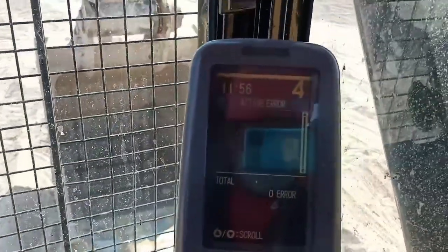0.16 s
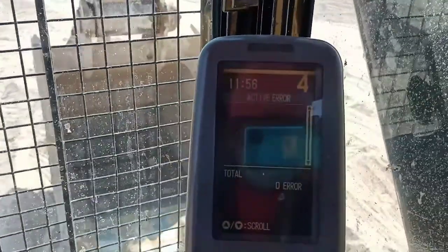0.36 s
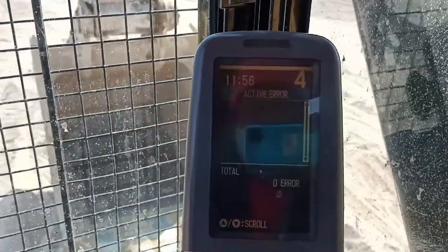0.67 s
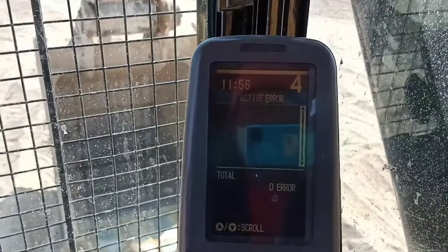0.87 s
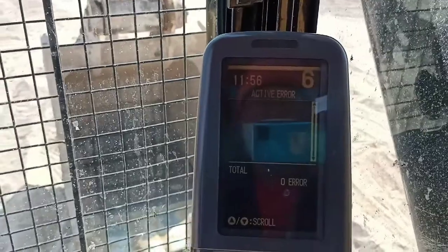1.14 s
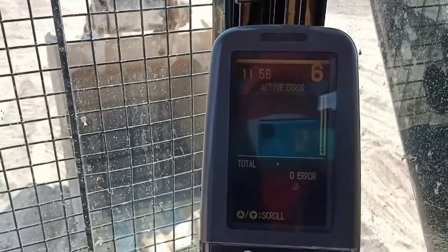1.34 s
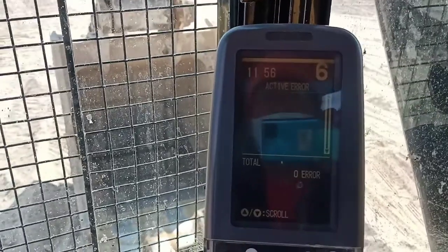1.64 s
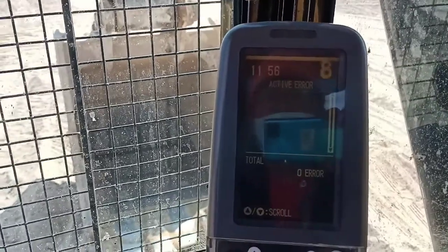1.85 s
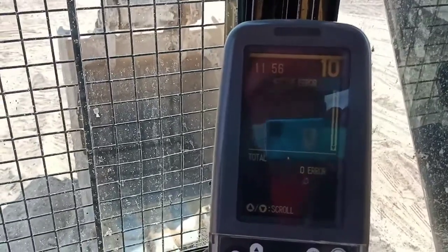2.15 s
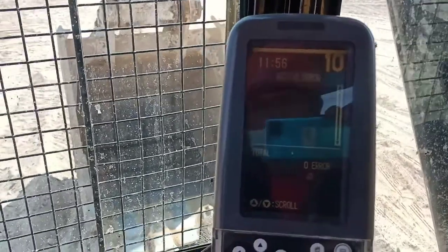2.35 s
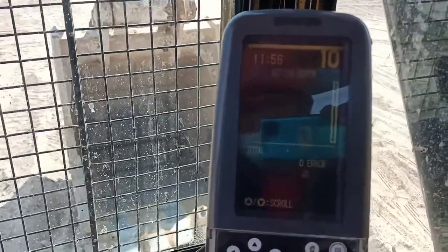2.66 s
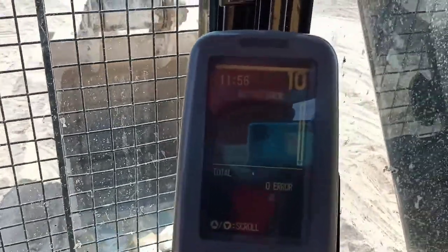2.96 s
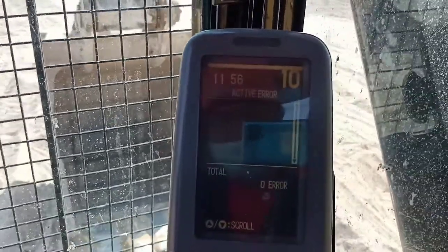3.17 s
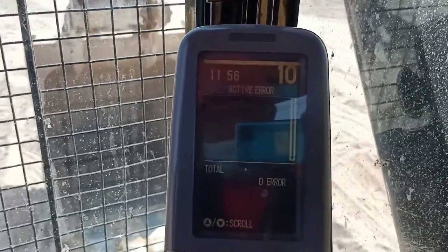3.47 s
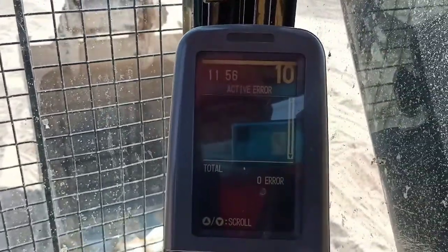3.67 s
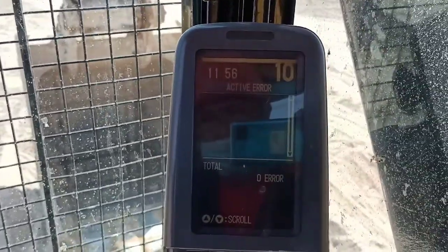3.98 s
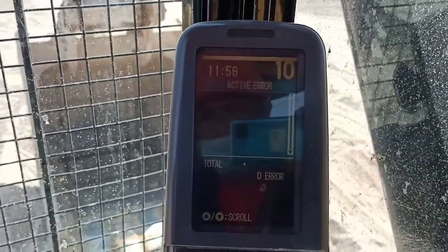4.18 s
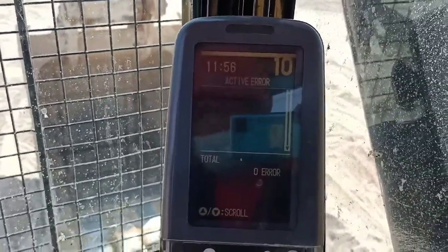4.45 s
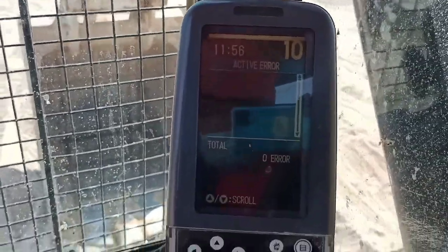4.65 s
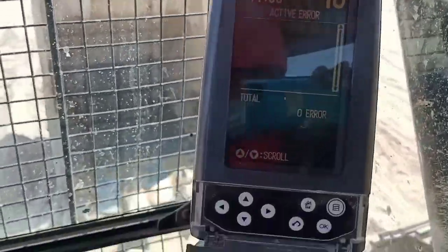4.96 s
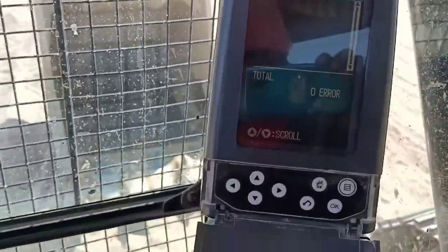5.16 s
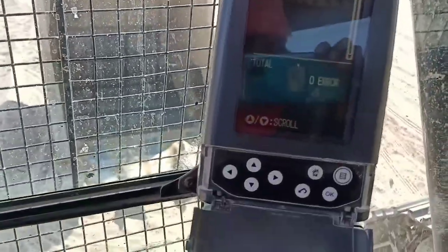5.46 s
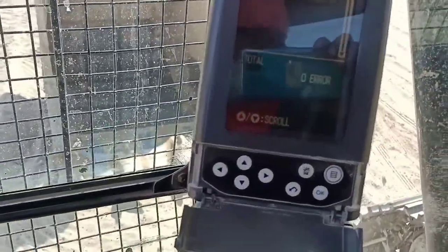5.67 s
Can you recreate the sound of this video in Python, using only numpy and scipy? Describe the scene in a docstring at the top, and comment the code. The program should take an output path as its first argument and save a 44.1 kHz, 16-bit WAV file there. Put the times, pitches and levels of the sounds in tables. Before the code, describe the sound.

A diesel excavator engine is heard throughout from inside the closed cab, starting at idle with a low boom, an uneven throb, metallic knocking and a faint whine of pumps and gears. At about 1.2 seconds a throttle dial gives two quick, close clicks, and the engine climbs to a middle speed by 1.7 seconds, knocking harder as it pulls. Around 2.0 to 2.2 seconds the dial ticks four more times. The engine rises again with a brief metallic rasp, overshoots slightly at 2.5 seconds and settles at full speed by 3 seconds. It then runs steadily, louder and more rattling than at idle, its roar gradually thickening. At about 4.6 seconds a hard fitting snaps with a bright click and a very short rattle. The engine carries on unchanged to the end, near 5.8 seconds.

```python
"""Excavator cab, throttling up

A six-cylinder diesel heard inside the closed cab. The throttle dial clicks round twice and the engine
steps from idle to half and then to full speed, overshooting a little. Exhaust pulses boom in the cab,
uneven cylinders throb, the block knocks, pumps and gears whine; near the end a hard fitting snaps."""
import sys
import numpy as np
from scipy import signal
from scipy.fft import rfft, irfft
from scipy.io import wavfile
from scipy.ndimage import uniform_filter1d

SR = 44100
rng = np.random.default_rng(int(sys.argv[2]) if len(sys.argv) > 2 else 0)


def master(y):
    """Save y as 16-bit WAV."""
    cut = np.clip(np.atleast_2d(y).T, -1, 1)
    pcm = np.round(cut * 32767)  # scale
    wavfile.write(sys.argv[1], SR, pcm.astype(np.int16))


N = 256662
TIME = np.arange(N) / SR
CYLINDERS = 6

# firing rate at idle, half and full speed: f/Hz
THROTTLE_HZ = [64.7, 80.5, 99]
# panel and block resonances: f/Hz, width/Hz, lift/dB
METAL_MODES = [(340, 57, 5), (717, 43, 7), (793, 24, 9), (934, 18, 9.5), (1452, 76, 5.5), (2059, 35, 8.5),
               (2197, 160, 4.5)]


def amp(db):
    """Decibels to gain."""
    return np.exp(np.asarray(db) * (np.log(10) / 20))


def unit(x):
    """Scale to rms 1."""
    return x / np.sqrt(np.mean(x ** 2))


def curve(points):
    """Join (time, value) points with straight lines."""
    return np.interp(TIME, *np.transpose(points))


def colour(x, points, modes=()):
    """EQ by (Hz, dB) points, falling steeply outside them, and lift the resonances; rms 1."""
    hz, db = np.transpose(points)
    bins = np.arange(1, N // 2 + 2) * SR / N
    octave, knots = np.log2(bins), np.log2(hz)
    outside = np.abs(octave - np.clip(octave, knots[0], knots[-1]))
    lift_db = sum(peak_db / (1 + (2 * (bins - centre) / width) ** 2) for centre, width, peak_db in modes)
    return unit(irfft(rfft(x) * amp(np.interp(octave, knots, db) + lift_db - 60 * outside), N))


def drift(rate_hz, hop=32):
    """Smooth random modulation, rms about 1."""
    coarse, size = np.arange(0, N + hop, hop) / SR, int(SR / hop / rate_hz)
    steps = np.repeat(rng.standard_normal(len(coarse) // size + 1), size)[:len(coarse)]
    return np.interp(TIME, coarse, unit(uniform_filter1d(uniform_filter1d(steps, size), size)))


def ringing(envelope, hz, width_hz, order=4):
    """Noise rings one resonance; the envelope sets its rms."""
    edges = np.clip([hz - width_hz / 2, hz + width_hz / 2], 20, SR / 2 - 1)
    band = signal.butter(order, edges, "band", fs=SR, output="sos")
    burst = signal.sosfilt(band, (envelope + 1e-18) * rng.standard_normal(N))
    return unit(burst) * np.sqrt(np.mean(envelope ** 2))


def fade(start, t60):
    """Sudden attack, exponential decay."""
    return (TIME >= start) * np.exp(-np.log(1000) * np.abs(TIME - start) / t60)


def tap(start, db, hz, width_hz, t60):
    """One short blow on a hard part."""
    return amp(db) * ringing(fade(start, t60), hz, width_hz)


def strike(blows, response):
    """Each blow starts the response; the engine is already running at time zero."""
    return signal.oaconvolve(np.pad(blows, (len(response) - 1, 0), "reflect"), response, "valid")


def revs(hz):
    """Speed as a share of the way from idle (0) to full (1)."""
    return (hz - THROTTLE_HZ[0]) / (THROTTLE_HZ[-1] - THROTTLE_HZ[0])


def rev_gain(hz, idle_db, rise_db):
    """Gain of a layer that grows by rise_db from idle to full speed."""
    return amp(idle_db + rise_db * revs(hz))


def finger_brush():
    """Fingers brush the dial before turning it: a faint, very high rustle of skin on plastic."""
    # touch of the fingers: t/s, level/dB
    touch = [(0.55, -100), (0.72, -72), (1.0, -69), (1.15, -100)]
    return ringing(amp(curve(touch)), hz=14500, width_hz=2000, order=2)


def cab_air(hz, load, rumble_db=-41, swell_db=11):
    """The cab's air rumbles as the speed changes and drones at one pitch, louder with the revs."""
    # rumble spectrum: f/Hz, level/dB
    spectrum = [(20, -20), (45, -9.5), (80, -5), (160, -4.5), (330, -10), (430, -17), (700, -40.5)]
    rumble = amp(rumble_db + swell_db * np.abs(load) * revs(hz)) * colour(rng.standard_normal(N), spectrum)
    drone = ringing(rev_gain(hz, idle_db=-52, rise_db=10.5), hz=168.4, width_hz=60, order=2)
    return rumble + drone


def loose_panel(hz, load, load_db=14):
    """A loose panel booms in fits, most under load."""
    drive = rev_gain(hz, idle_db=-47, rise_db=1.5) * amp(load_db * load)
    return ringing(drive, hz=346, width_hz=24, order=2)


def roar():
    """The engine's low-mid roar thickens as the listener leans forward."""
    # swell of the roar: t/s, level/dB
    swell = [(1.3, -59), (2.4, -56.5), (4.3, -45.5), (4.9, -45.5), (5.82, -43)]
    return ringing(amp(curve(swell)), hz=660, width_hz=386)


def rasp(flicker_db=2.7):
    """A flickering metallic rasp above the knock, harshest on a hard pull."""
    # bite of the rasp: t/s, level/dB
    bite = [(1.28, -58), (1.39, -50), (1.48, -48.5), (1.63, -47), (1.8, -59), (2.2, -51), (2.33, -45.5),
            (2.49, -41.5), (2.58, -53), (2.7, -55), (2.85, -53.5), (4.95, -52.5), (5.1, -48), (5.82, -53)]
    return ringing(amp(curve(bite) + flicker_db * drift(45)), hz=2840, width_hz=510, order=3)


def gear_whistle(hz, cycle, order=233):
    """A thin gear whistle: a rough smear as the engine gathers speed, clearer at half speed."""
    db = np.interp(hz, [65, 73, 81, 90], [-70, -52.5, -55.5, -65]) + 2.5 * drift(25)
    wobble_rad = np.interp(hz, [72, 78], [1.7, .75])
    return np.sqrt(2) * amp(db) * np.sin(2 * np.pi * order * cycle + wobble_rad * drift(90))


def whines(hz, cycle, waver_db=2, wobble_rad=0.48):
    """Pump pistons and gear teeth sing with the shaft, most of them louder as it speeds up."""
    # whines: multiple of the cycle rate (rounded below), idle level/dB, full-speed level/dB
    partials = [(30, -52.5, -53), (34, -65.5, -56), (36, -59.5, -52.5), (39, -58, -60), (42, -70, -57.5),
                (44, -71, -55), (45, -59, -59.5), (49, -72.5, -53.5), (56, -64.5, -57), (59, -70, -56.5),
                (60, -69, -56), (62.85, -58, -55), (68.37, -55, -60), (73.24, -65.5, -54.5),
                (83, -67, -66.5), (87.4, -59.5, -59), (90.7, -71, -55), (107.9, -65, -51.5),
                (126.5, -64, -52), (209.7, -72, -62.5), (257, -77, -67), (415, -88, -72.5)]
    out = 0
    for order, idle_db, full_db in partials:
        db = idle_db + (full_db - idle_db) * revs(hz) + waver_db * drift(12)
        phase = 2 * np.pi * (round(order) * cycle + rng.random()) + wobble_rad * drift(16)
        out += amp(db) * np.sin(phase)
    return np.sqrt(2) * out


def throttle_dial(cab_db=-16, cab_t60=0.045):
    """A sprung ball ticks off one notch and drops into the next, ringing the knob; the cab answers."""
    # detents: t/s, tick level/dB, bright edge level/dB, seating delay/s, seating level/dB, f/Hz, width/Hz
    detents = [(1.1988, -39.5, -57, 0.0031, -30, 4080, 450), (1.2524, -40.5, -53, 0.0029, -34, 4660, 450),
               (2.032, -38.5, -48, 0.0016, -53, 5170, 3000), (2.0868, -41, -51, 0.0048, -33, 6700, 3200),
               (2.14, -42.5, -44, 0.003, -50, 6000, 3000), (2.1837, -44.5, -47, 0.0054, -46, 6560, 2000)]
    # tick spectrum: f/Hz, level/dB
    spectrum = [(1500, -22), (2700, 6), (3500, 4), (4700, 0.5), (6800, 3), (8200, -6), (9000, -0.5),
                (12000, -13), (13000, -5), (15000, -5)]
    tick = colour(rng.standard_normal(N), spectrum)
    out = tap(start=1.2028, db=-28, hz=2650, width_hz=700, t60=.012)  # the knob knocks on its shaft
    for start, tick_db, edge_db, delay, seat_db, ring_hz, width_hz in detents:
        out += amp(tick_db) * tick * (fade(start, t60=0.062) + amp(cab_db) * fade(start, cab_t60))
        out += tap(start, edge_db, hz=15200, width_hz=900, t60=.04)
        seating = fade(start + delay, t60=0.0058) + amp(cab_db) * fade(start + delay, cab_t60)
        out += amp(seat_db) * ringing(seating, ring_hz, width_hz, order=2)
    return out


def twang(start, db, first_hz, last_hz, fall_s, t60):
    """A springy ring that drops quickly in pitch as it dies."""
    hz = last_hz + (first_hz - last_hz) * np.exp(-np.maximum(TIME - start, 0) / fall_s)
    return np.sqrt(2) * amp(db) * fade(start, t60) * np.sin(2 * np.pi * np.cumsum(hz) / SR)


def fitting_snap():
    """A hard fitting snaps: a bright click and a twang, then a dull knock and a short rattle."""
    # blows of the fitting: t/s, level/dB, f/Hz, width/Hz, t60/s
    blows = [(4.5515, -27, 1900, 1500, .022), (4.5518, -38, 4800, 1300, .02), (4.5562, -27, 1150, 900, .04),
             (4.5595, -27.5, 2100, 1500, .04), (4.6084, -17.5, 1900, 1600, .008),
             (4.6085, -38.5, 3500, 1500, .012), (4.617, -32, 1150, 600, .04), (4.634, -36, 2800, 1300, .05),
             (4.641, -35, 1200, 700, .04)]
    rattle = sum(tap(*blow) for blow in blows)
    edge = tap(start=blows[0][0], db=-46, hz=6740, width_hz=11030, t60=0.031)
    return rattle + edge + twang(start=4.5526, db=-32, first_hz=4250, last_hz=2550, fall_s=.012, t60=.06)


def clatter(cycle, t60, fresh, uneven, scatter_db):
    """Each cylinder rings the metal its own way every cycle; the fresh share of the power is new noise."""
    # accent of each cylinder in firing order, scaled by uneven: level/dB
    accents = [1.7, 0.6, 0.5, 0.088, -1.6, -0.87]
    decay = np.exp(-np.log(1000) * TIME[:SR // 10] / t60)
    repeating, power = 0, 0
    for cylinder, db in enumerate(accents):
        count = np.floor(cycle - cylinder / CYLINDERS)
        blows = np.diff(count, prepend=count[0]) * amp(uneven * db + scatter_db * rng.standard_normal(N))
        repeating += strike(blows, decay * rng.standard_normal(len(decay)))
        power += strike(blows ** 2, decay ** 2)
    return np.sqrt(1 - fresh) * repeating + np.sqrt(fresh * np.abs(power)) * rng.standard_normal(N)


def casing_rumble(hz, load, cycle, load_db=3):
    """The firings shake the casing, harder with speed and load."""
    # casing spectrum: f/Hz, level/dB
    spectrum = [(290, -2), (380, -3.5), (440, -8), (500, -2.5), (600, -12.5), (800, -6.5), (1000, -7),
                (1320, -9), (1630, -11), (1900, -11)]
    blows = clatter(cycle, t60=0.14, fresh=0.43, uneven=1.0, scatter_db=0.1)
    gain = rev_gain(hz, idle_db=-41.6, rise_db=3.3) * amp(load_db * load)
    return gain * colour(blows, spectrum, METAL_MODES)


def engine_hiss(hz, surge, cycle, surge_depth=0.68):
    """A little hiss pulses with the firings and swells with the knock."""
    # hiss spectrum: f/Hz, level/dB
    spectrum = [(2180, -16.5), (3700, -2), (4030, -7), (4380, -2.5), (5000, -6), (6250, -11.5), (6760, -13),
                (7620, -18.5), (9020, -19.5), (9810, -14), (11000, -22), (14900, -28), (15600, -27)]
    blows = clatter(cycle, t60=0.33, fresh=0.47, uneven=0.7, scatter_db=2.0)
    return rev_gain(hz, idle_db=-58, rise_db=4.24) * amp(surge_depth * surge) * colour(blows, spectrum)


def diesel_knock(hz, surge, cycle, surge_depth=0.62, valve_db=-1.0, burst_db=0.86):
    """Combustion knocks with valves closing in between, loosely timed and in uneven bursts."""
    # engine block spectrum: f/Hz, level/dB
    spectrum = [(1750, -8), (1930, -6), (2020, -4), (2400, -2.5), (2650, -8.5), (3080, -14), (3310, -17.5),
                (4000, -25)]
    # the cylinders differ most at idle, so single knocks stand out; at speed they blur into a rattle
    uneven = np.interp(hz, THROTTLE_HZ, [1.6, 1.1, .7])
    fresh = np.interp(hz, THROTTLE_HZ, [.33, .5, .6])
    loose = cycle + .0015 * drift(14)
    firing, valves = (clatter(loose + offset, t60=.17, fresh=fresh, uneven=uneven, scatter_db=1.2)
                      for offset in (0, .5 / CYLINDERS))
    blows = (firing + amp(valve_db) * valves) * amp(burst_db * drift(35))
    gain = rev_gain(hz, idle_db=-42, rise_db=6.3) * amp(surge_depth * surge)
    return gain * colour(blows, spectrum, METAL_MODES)


def throb(hz, load, cycle, waver_db=2, sway_rad=.3, panel_hz=341, panel_width_hz=9, panel_db=13):
    """Unequal cylinders sound harmonics of the cycle rate: a burble at low revs, a thump at full speed."""
    # strong harmonics: order, level/dB at idle, half and full speed, lift under full load/dB
    strong = [(7, -56, -44, -52.5, 3), (8, -49, -45, -59, 1), (9, -41.5, -40.5, -34, 7),
              (10, -48, -42, -38, 2), (11, -70, -37, -39.5, -8), (13, -41.5, -41, -34.5, -5),
              (14, -37, -37, -38, 2), (15, -46.5, -55, -40, -3), (16, -41.5, -39, -38, -7.5),
              (18, -37.5, -40.5, -39.5, 1), (19, -51.5, -52, -46.5, -12), (20, -39.5, -41, -43, -1),
              (22, -65, -60, -47, -3)]
    # the others are weak; 6 and 12 belong to the cab boom
    harmonics = {order: (-58, -57, -57.5, 3) for order in range(5, 29) if order not in (6, 12)}
    harmonics.update({order: levels for order, *levels in strong})
    gathered = np.interp(hz, THROTTLE_HZ[1:], [0, 1])
    slack_db = 3 * np.minimum(load, 0)  # the throb slackens while the fuel is cut
    out = 0
    for order, (*steady_db, load_db) in harmonics.items():
        db = np.interp(hz, THROTTLE_HZ, steady_db) + waver_db * drift(7.7)
        db += load_db * np.maximum(load, 0) + slack_db
        if order % 2 == 0:  # multiples of the crank rate swell as they run through a panel resonance
            detune = (order * hz / CYLINDERS - panel_hz) / panel_width_hz
            db += panel_db / (1 + detune ** 4)
        # dispersion smears the thump over the whole cycle at low revs, over a few ms at full speed
        smeared = np.angle(1j * np.exp(2j / 3 * (order - 12) ** 2))
        rounded = 0.037 * (order - 15) ** 2
        stray = max(np.interp(order, [16, 21], [0, 1]), .1)  # upper harmonics stay out of the thump
        phase = smeared + gathered * (1 - stray) * (rounded - smeared) + sway_rad * drift(9.1)
        out += amp(db) * np.cos(2 * np.pi * order * cycle + phase)
    return np.sqrt(2) * out


def cab_boom(hz, load, cycle, waver_db=1.0, push=1.4, light_load=0.21, null_hz=86.4, null_width_hz=2.8):
    """Exhaust pulses press on the cab at the firing rate and its octave, harder under load."""
    phase = 2 * np.pi * CYLINDERS * cycle
    root = amp(np.interp(hz, THROTTLE_HZ, [-34, -27, -25]) + waver_db * drift(5.8)) * (1 + push * load)
    octave = amp(np.interp(hz, THROTTLE_HZ, [-29.5, -21.5, -41]) + waver_db * drift(5.0))
    octave += amp(-18) * np.maximum(load - light_load, 0)  # swells only on a hard pull
    # the octave flips through the cab's air resonance above idle, and again where it cancels at the ear
    lag = np.interp(hz, THROTTLE_HZ[:2], [0, np.pi])
    null = np.tanh((null_hz - hz) / null_width_hz)
    return np.sqrt(2) * (root * np.cos(phase) + null * octave * np.cos(2 * phase - lag))


def scene():
    """One crankshaft times the engine's pulses and tones; the dial and the snap sit on top."""
    # crank speed as firing rate: t/s, f/Hz
    firing_rate = [(0, 64.37), (1.32, 64.94), (1.56, 78.57), (1.72, 80.9), (1.85, 80.82), (2.18, 80.3),
                   (2.52, 102.1), (2.62, 101.4), (2.8, 97.1), (2.96, 99.1), (5.82, 98.74)]
    # the governor adds fuel for each step and cuts it after the overshoot: t/s, load (0 holds, 1 pulls)
    governor = [(1.31, 0.046), (1.44, 0.69), (1.65, 0.47), (1.88, -0.17), (2.17, 0.049), (2.31, 0.74),
                (2.55, 0.64), (2.6, -0.093), (2.72, -0.58), (2.8, 0.2), (3.15, -0.038)]
    # the knock hardens on each step and swells at times at full speed: t/s, level/dB before surge_depth
    knock_surge = [(1.26, 2.9), (1.305, 6.5), (1.44, 7), (1.65, 2), (1.88, -0.5), (2.14, -0.3), (2.29, 6),
                   (2.44, 5), (2.57, -1), (2.7, -4), (2.83, 3), (2.98, 1.5), (3.1, -1), (4.5, -1),
                   (4.72, -1), (4.9, -3), (5.06, 0.2), (5.48, -1.5), (5.82, -0.5)]
    hz, load, surge = curve(firing_rate), curve(governor), curve(knock_surge)
    cycle = .05 + np.cumsum(hz) / SR / CYLINDERS  # running count of four-stroke cycles
    engine = cab_boom(hz, load, cycle) + throb(hz, load, cycle)
    engine += casing_rumble(hz, load, cycle) + engine_hiss(hz, surge, cycle)
    engine += cab_air(hz, load) + loose_panel(hz, load) + diesel_knock(hz, surge, cycle)
    engine += whines(hz, cycle) + gear_whistle(hz, cycle) + rasp() + roar()
    return (engine + finger_brush() + throttle_dial() + fitting_snap())[None]


def record(dry, top_hz=15600):
    """A steep low-pass takes off the very top."""
    return signal.sosfilt(signal.ellip(10, .2, 80, top_hz, fs=SR, output="sos"), dry)


dry = scene()
out = record(dry)
master(out)
```